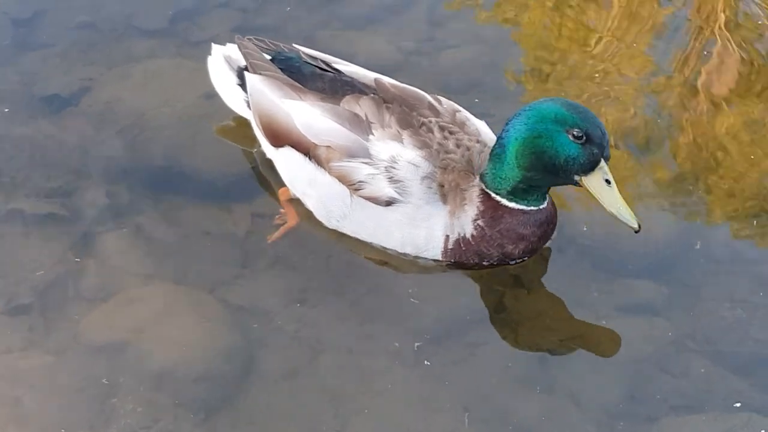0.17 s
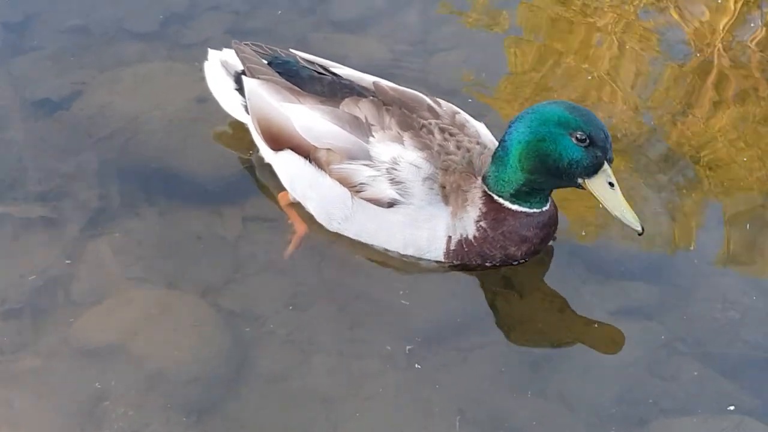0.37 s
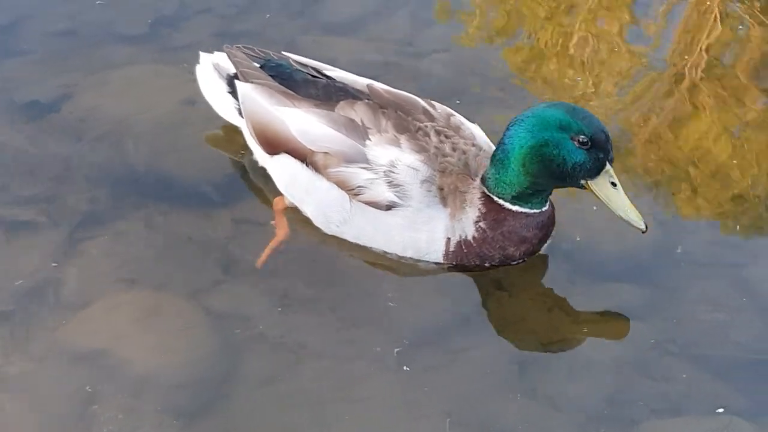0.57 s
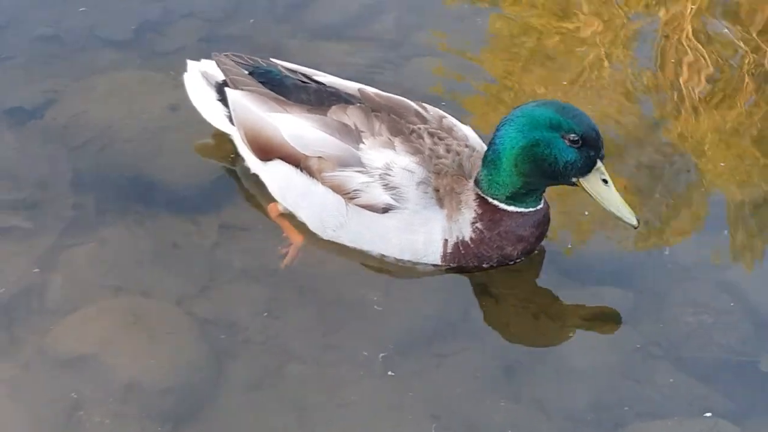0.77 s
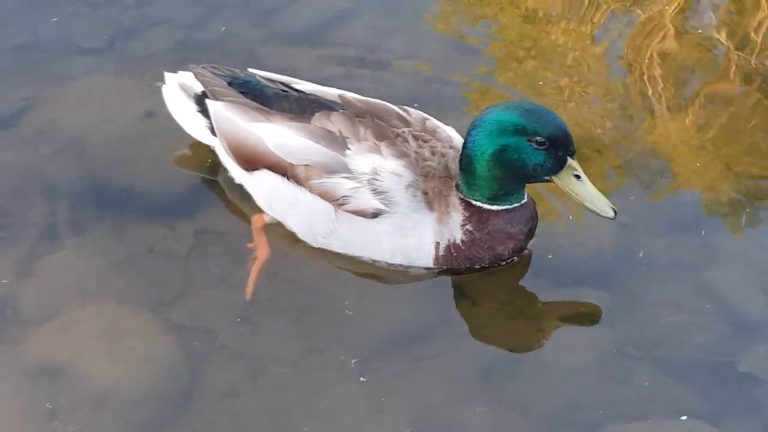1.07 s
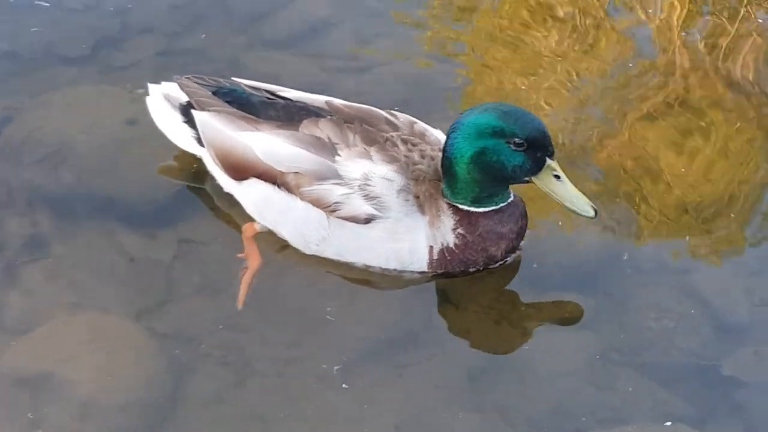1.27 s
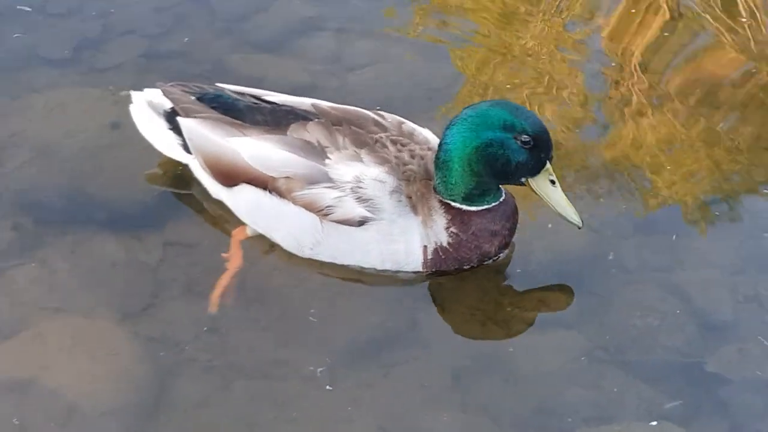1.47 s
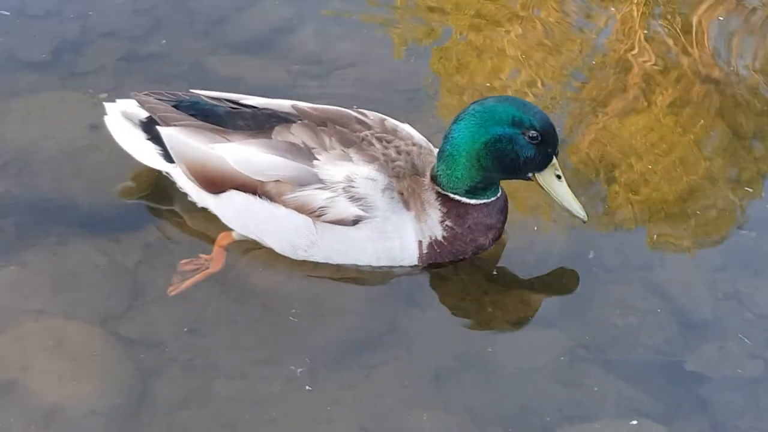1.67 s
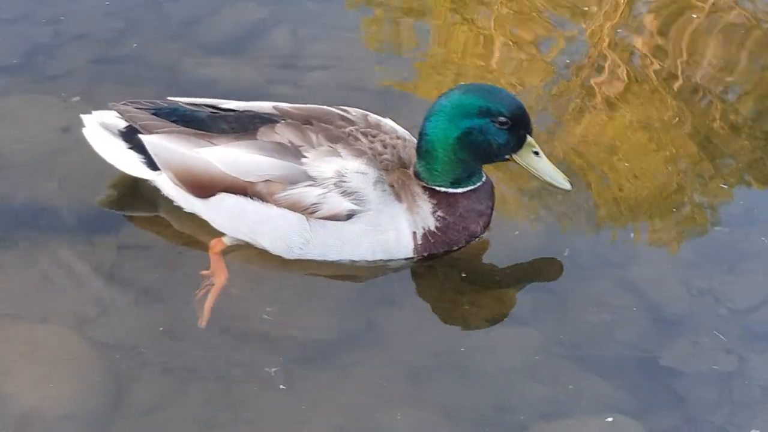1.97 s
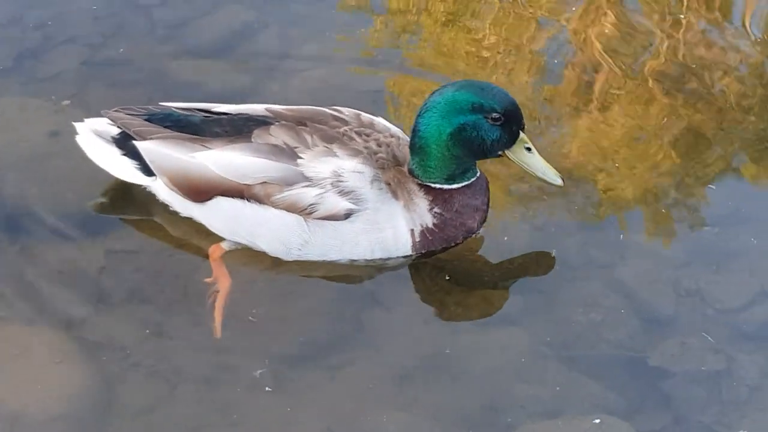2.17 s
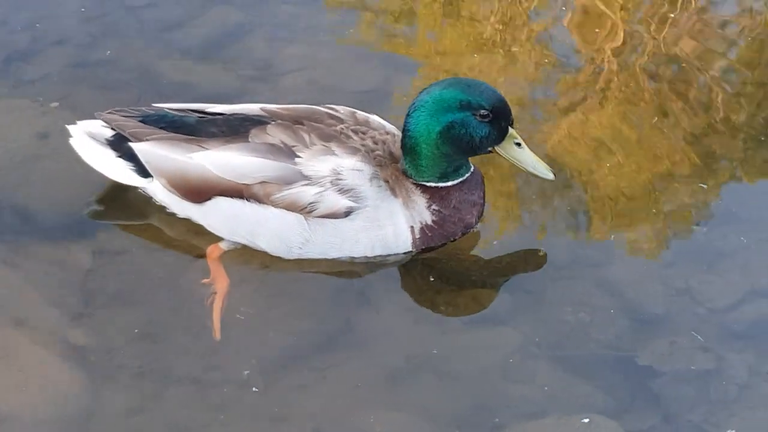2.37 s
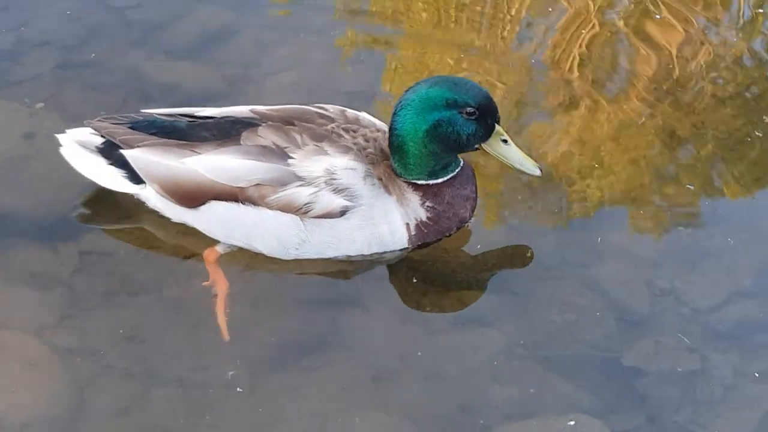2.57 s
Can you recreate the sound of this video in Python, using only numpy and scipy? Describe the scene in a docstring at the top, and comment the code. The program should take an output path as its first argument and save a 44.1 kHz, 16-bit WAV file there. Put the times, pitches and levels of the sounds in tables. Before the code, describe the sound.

Soft, raspy quacks come in quick little groups from a nearby duck on a pond. Under them is a quiet outdoor background, with light wind on the microphone, a faint rustle and a few low handling thumps, strongest midway.

```python
"""Pond. A mallard drake, close by on the right, gives soft raspy quacks, mostly in pairs.
Each is a short rattle of syrinx pulses ringing in throat and mouth, brighter with effort;
water and bank answer faintly. Handling bumps, scuffs and light wind rumble on the left
of the microphone; a soft rustle swells on the right, over quiet distant surroundings."""
import sys
import numpy as np
from scipy import signal
from scipy.fft import rfft, irfft
from scipy.io import wavfile
from scipy.ndimage import map_coordinates

SR = 44100
rng = np.random.default_rng(int(sys.argv[2]) if len(sys.argv) > 2 else 0)


def transcribe(u):
    """Save the signal u as a 16-bit wav file named by the first command-line argument.

    u: samples, shape (n,) or (channels, n), limited to [-1, 1]; the rate is SR.
    q: integer samples, one column per channel.
    """
    v = np.clip(np.atleast_2d(u).T, -1, 1)
    q = np.round(v * 32767).astype(np.int16)
    wavfile.write(sys.argv[1], SR, q)


N = 119952

# distant surroundings (frequency [Hz], level [dB])
POND_SPECTRUM = [(25, -16), (75, -0.5), (160, -2.5), (290, -8), (420, -20), (570, -21), (900, -30.5),
                 (1350, -29.5), (1650, -24), (2300, -31.5), (3200, -40.5), (5500, -39), (7600, -33),
                 (8600, -41.5), (15500, -40.5)]
# same (frequency [Hz], left-right correlation [-])
POND_CORRELATION = [(60, 1), (500, 0.86), (2000, 0.34), (8000, 0.34), (14000, 0.16)]
# wind (time [s], level [dB])
WIND_ENVELOPE = [(0, -48), (.3, -53.5), (.68, -51), (.8, -43), (1.05, -47.5), (1.2, -44), (1.48, -44.5),
                 (1.56, -48.5), (1.95, -47), (2.35, -48.5), (2.54, -43), (2.72, -39.5)]
# wind (frequency [Hz], level [dB])
WIND_SPECTRUM = [(20, -9.5), (45, 0), (90, 2), (140, -3), (220, -14.5), (400, -27), (700, -38), (1200, -43),
                 (4000, -117)]
# rustle (time [s], level [dB])
RUSTLE_ENVELOPE = [(0, -79), (.74, -71), (.8, -61.5), (.86, -55.5), (.96, -61), (1.01, -68), (1.08, -63.5),
                   (1.3, -62), (1.5, -59), (1.62, -58), (1.68, -65.5), (1.85, -70.5), (2.23, -71.5),
                   (2.3, -54.5), (2.39, -54), (2.52, -59.5), (2.72, -62)]
# rustle (frequency [Hz], level [dB])
RUSTLE_SPECTRUM = [(300, -23), (800, -14.5), (1300, -5), (1900, 0), (3000, -3), (5500, -3.5), (7400, 1),
                   (8500, -3.5), (10000, -5), (12500, -13.5), (15500, -32)]
# handling bumps (time [s], level [dB], settled pitch [Hz], decay [s])
BUMPS = [(.512, -35.5, 101, 0.013), (0.741, -34, 82, 0.018), (1.212, -29, 73.4, 0.007),
         (1.247, -18.5, 83.6, 0.005), (1.449, -26, 87, 0.0065), (1.468, -30.5, 61, 0.01),
         (1.493, -31, 92, 0.0065), (1.629, -23, 86, 0.0093), (1.713, -33.5, 72, 0.0079),
         (2.005, -28, 120, 0.0045), (2.018, -29.5, 64.6, 0.0075), (2.1251, -18, 89, 0.0066),
         (2.234, -34, 67, 0.0096), (2.367, -25.5, 91.4, 0.01), (2.464, -32, 49.7, 0.011),
         (2.511, -32.5, 113, 0.012), (2.616, -36, 130, 0.0069)]
# light scuffs on the housing (time [s], level [dB], decay [s])
SCUFFS = [(1.243, -45, 0.0051), (1.444, -64, 0.0083), (1.478, -57.5, 0.05), (2.123, -39.5, 0.0021),
          (2.37, -68, 0.0063), (2.513, -49.5, 0.016), (2.55, -55, 0.016), (2.617, -56, .01),
          (2.645, -53, .01)]
# scuffs (frequency [Hz], level [dB])
SCUFF_SPECTRUM = [(100, -38), (300, 3.5), (650, 1.5), (1100, -14.5), (2500, -29), (9000, -30)]
# puffs as the bill parts (time [s], level [dB], decay [s])
BILL_PUFFS = [(.2, -49, 0.028), (.737, -57, 0.074), (.905, -53.5, .015), (1.556, -54, 0.02),
              (1.71, -48.5, 0.022), (2.098, -49.5, 0.013), (2.648, -59.5, 0.047)]
# bill puffs (frequency [Hz], level [dB])
BILL_SPECTRUM = [(400, -1.5), (850, -3), (1080, 6), (1400, -1.5), (1750, 1.5), (2400, -12.5), (9000, -36),
                 (15000, -41)]
# quacks (start [s], length [s], level [dB], mean pulse rate [Hz], throat centre [Hz], glide [Hz],
#   mouth gain [dB], nasal centre [Hz], nasal gain [dB], rasp gain [dB], top centre [Hz], top gain [dB])
QUACKS = [(0.139, 0.058, -49.5, 105.5, 1550, -100, 8.5, 2630, -21, -1, 6300, -44),
          (0.223, 0.069, -34, 102.6, 1664, -17, 3, 3210, -20.5, -1.5, 6000, -39.5),
          (0.321, 0.045, -52, 104.4, 1580, -2, 6.5, 2250, -4, 3, 6300, -40),
          (0.395, 0.064, -41.5, 96, 1610, -150, 7, 2760, -27, 1.5, 6200, -38),
          (0.462, 0.063, -32.5, 101, 1692, 140, 4, 3200, -22.5, -0.5, 6300, -37),
          (0.767, 0.05, -35.5, 99.3, 1683, -110, -1, 2700, -27, -26, 6300, -38),
          (0.924, 0.068, -31, 102.1, 1675, 0, -0.5, 3050, -24, -1.5, 5950, -29.5),
          (0.9916, 0.081, -35.5, 94, 1660, -30, 4, 2610, -20, -0.5, 6600, -39),
          (1.1528, 0.069, -33, 96.6, 1637, 44, 2.5, 3080, -32, -5.5, 6330, -31),
          (1.259, 0.055, -38.5, 85.8, 1600, -160, 4.5, 2700, -20.5, -3, 6300, -39),
          (1.5738, 0.071, -32.5, 101.7, 1652, 47, -3, 2850, -24, 0, 6670, -31),
          (1.636, 0.055, -53, 99.2, 1420, -90, 7, 2980, -10, 13.5, 6500, -34),
          (1.732, .046, -35.5, 91.9, 1647, -50, -2, 2810, -29, -27, 6600, -40),
          (1.7795, 0.082, -34.5, 97.7, 1690, 88, 1.5, 2970, -26.5, -1, 6430, -29.5),
          (1.975, .083, -38, 88.7, 1634, -37, 4.5, 2760, -18.5, -8, 6420, -33.5),
          (2.1162, 0.07, -35, 101.7, 1715, 27, 3, 2880, -22, 4, 6600, -27),
          (2.235, 0.065, -40.5, 87.9, 1610, -110, 8, 2670, -24, 0.5, 6500, -32),
          (2.331, 0.069, -38.5, 86.1, 1722, 90, 4, 2780, -30, -1, 6300, -42),
          (2.668, 0.0493, -39, 90.7, 1650, -30, 4, 2720, -31, -5, 6540, -32)]
# mouth resonances (bill shut [Hz], bill open [Hz], width [Hz], gain [dB], effort share [-], swell [dB])
MOUTH_MODES = [(1076, 1200, 219, -18.5, 0.38, 7.5), (1802, 2038, 450, -12.5, 0.55, -1)]
# top resonances (frequency ratio [-], gain [dB])
TOP_MODES = [(.9, 0), (1, 1.5)]
# high rasp (frequency [Hz], level [dB])
RASP_SPECTRUM = [(900, -25), (2000, 6.5), (2400, 20.5), (2700, 13), (3000, 8), (3300, -4), (3520, 3),
                 (3920, 6), (4400, -4.5), (5000, -1.5), (5500, -12), (6600, -14), (7400, -3), (9000, -20),
                 (15000, -34)]

EDGE_DB, END_DB, CREST_FRACTION = -8.5, -11, .48  # effort arch
JITTER_S, SCATTER_DB, SLOWING = .0003, 2.25, 0.0808  # pulse train
RISE_S, PUFF_DECAY_S, LEAK_DB = 0.00068, 0.005, -12.5  # turbulence
THROAT_PUFF_DB, RASP_DB = -5.5, -17.5
HANDLING_PAN_DB = 12


def amp(db):
    """Decibels to gain."""
    return 10 ** (np.asarray(db) / 20)


def unit(x):
    """Scale to rms 1."""
    return x / np.sqrt(np.mean(x ** 2) + 1e-20)


def along(points, hz):
    """Interpolate (frequency [Hz], value) on a log axis."""
    knots_hz, values = np.transpose(points)
    return np.interp(np.log(hz + 1), np.log(knots_hz + 1), values)


def curve(rows):
    """Interpolate (time [s], value) per sample."""
    return np.interp(np.arange(N) / SR, *np.transpose(rows))


def wobble(rate_hz):
    """Smooth curve through random knots."""
    knots = rng.standard_normal(int(N * rate_hz / SR) + 4)
    return map_coordinates(knots, [np.arange(N) * rate_hz / SR])


def pan(db):
    """Channel gains for a left-minus-right level; louder side at 1."""
    return amp([[min(db, 0)], [min(-db, 0)]])


def add(track, start_s, sound):
    """Mix in at a time."""
    part = track[max(round(start_s * SR), 0):][:len(sound)]
    part += sound[:len(part)]


def colour(x, spectrum, size=4096):
    """Minimum-phase filter of unit energy."""
    cepstrum = irfft(np.log(amp(along(spectrum, np.fft.rfftfreq(size, 1 / SR)))))
    cepstrum[1:size // 2] *= 2
    cepstrum[size // 2 + 1:] = 0
    impulse = irfft(np.exp(rfft(cepstrum)))
    return signal.fftconvolve(x, impulse / np.linalg.norm(impulse))[:N]


def stereo_noise(spectrum, correlation):
    """Coloured, partly correlated noise, rms 1."""
    hz = np.fft.rfftfreq(N, 1 / SR)
    angle = np.arccos(np.clip(along(correlation, hz), -1, 1)) / 2
    bins = rfft(rng.standard_normal((2, N))) * amp(along(spectrum, hz))
    mid, side = irfft(bins * [np.cos(angle), np.sin(angle)], N)
    return unit(np.array([mid + side, mid - side]))


def bursts(rows, spectrum):
    """Decaying bursts of coloured noise."""
    track, t = np.zeros(N), np.arange(SR // 10) / SR
    for start_s, db, decay_s in rows:
        add(track, start_s, amp(db) * np.exp(-t / decay_s) * rng.standard_normal(len(t)))
    return colour(track, spectrum)


def resonate(x, hz, width_hz):
    """Three equal resonators in series, each width_hz wide; centre may move; rms 1."""
    carrier = np.exp(2j * np.pi * np.cumsum(hz * np.ones(len(x))) / SR)
    pole = np.exp(-np.pi * width_hz / SR)
    ring = signal.lfilter([1], np.poly([pole, pole, pole]), x / carrier)
    return unit((ring * carrier).real)


def pond(level_db=-53):
    """Steady wash of distant surroundings."""
    return amp(level_db) * stereo_noise(POND_SPECTRUM, POND_CORRELATION) * pan(db=-5.5)


def wind():
    """Light, lumpy rumble, mostly on the left microphone port."""
    level_db = curve(WIND_ENVELOPE) + 0.67 * wobble(rate_hz=8.2)
    return amp(level_db) * stereo_noise(WIND_SPECTRUM, correlation=[(100, 0.99)]) * pan(db=12)


def rustle():
    """Sliding hiss, like a sleeve near the right port."""
    hiss = stereo_noise(RUSTLE_SPECTRUM, correlation=[(3000, 0.89)])
    return amp(curve(RUSTLE_ENVELOPE)) * hiss * pan(db=-13.5)


def bumps(overshoot=1.85, sag_s=0.0024, rise_s=0.0019):
    """Soft knocks on the microphone housing: a cycle or two, sagging in pitch."""
    track, t = np.zeros(N), np.arange(SR // 8) / SR
    for start_s, db, hz, decay_s in BUMPS:
        cycles = hz * (t + overshoot * sag_s * (1 - np.exp(-t / sag_s)))
        envelope = (1 - np.exp(-(t / rise_s) ** 2)) * np.exp(-(t / (2 * decay_s)) ** 2)
        add(track, start_s, amp(db) * envelope * np.sin(2 * np.pi * cycles))
    return track * pan(HANDLING_PAN_DB)


def scuffs():
    """Light rubs on the housing."""
    return bursts(SCUFFS, SCUFF_SPECTRUM) * pan(HANDLING_PAN_DB)


def bank_echo(x, t60_s=.15, gain_db=-12):
    """Short diffuse reflection off water and bank."""
    t = np.arange(SR // 2) / SR
    tail = rng.standard_normal((2, len(t))) * amp(-60 * t / t60_s)
    echo = signal.fftconvolve(x[None], tail / np.linalg.norm(tail[0]), axes=1)[:, :N]
    return amp(gain_db) * echo * pan(db=-13)


def bill_puffs():
    """Faint air as the bill parts before some quacks."""
    return bursts(BILL_PUFFS, BILL_SPECTRUM)


def syrinx(length_s, rate_hz, release_s=0.006):
    """Source of one quack: slowing, uneven pulses, turbulence after each, an arch of effort."""
    t = np.arange(int((length_s + release_s) * SR)) / SR
    before_crest = np.maximum(1 - t / length_s / CREST_FRACTION, 0)
    after_crest = np.maximum((t / length_s - CREST_FRACTION) / (1 - CREST_FRACTION), 0)
    effort_db = EDGE_DB * before_crest ** 2 + END_DB * after_crest ** 2
    effort_db += np.interp(t, [length_s, t[-1]], [0, -18])  # release
    beats_s = np.arange(0, length_s, 1 / rate_hz)
    jitter, scatter = rng.standard_normal((16, 2))[:len(beats_s)].T
    beats_s = beats_s * (1 + SLOWING * (beats_s / length_s - 1)) + JITTER_S * jitter
    beat_samples = np.clip(beats_s * SR, 0, len(t) - 1).astype(int)
    pulses = np.bincount(beat_samples, amp(SCATTER_DB * scatter), len(t))
    puff_shape = np.exp(-t / PUFF_DECAY_S) * (1 - np.exp(-t / RISE_S))
    gate = signal.fftconvolve(pulses, puff_shape)[:len(t)]
    puffs = (unit(gate) + amp(LEAK_DB)) * rng.standard_normal(SR // 4)[:len(t)]
    return t, unit(pulses), unit(puffs), effort_db


def quacks(brightening=1.3):
    """Pulses ring the gliding throat and arching mouth; nasal ring, top ring and rasp grow with effort."""
    voice, rasp = np.zeros((2, N))
    for (start_s, length_s, db, rate_hz, throat_hz, glide_hz,
         mouth_db, nasal_hz, nasal_db, rasp_db, top_hz, top_db) in QUACKS:
        t, pulses, puffs, effort_db = syrinx(length_s, rate_hz)
        progress = np.minimum(t / length_s, 1)
        opening = np.sin(np.pi * progress)
        fade = np.minimum((t[-1] - t) / (t[-1] - length_s), 1)
        reedy = pulses + amp(THROAT_PUFF_DB) * puffs
        airy = pulses + puffs
        throat = resonate(reedy, throat_hz + glide_hz * (progress - .5), width_hz=323)
        add(voice, start_s, amp(db + effort_db) * throat)
        delayed_s = start_s + RISE_S
        for shut_hz, open_hz, width_hz, mode_db, share, swell_db in MOUTH_MODES:
            level_db = db + mouth_db + mode_db + share * effort_db + swell_db * (progress - .5)
            mouth = resonate(airy, shut_hz + (open_hz - shut_hz) * opening, width_hz)
            add(voice, delayed_s, amp(level_db) * fade * mouth)
        push = amp(db + brightening * effort_db)
        nasal = resonate(airy, nasal_hz, width_hz=330)
        add(voice, delayed_s, amp(nasal_db) * push * opening * nasal)
        for ratio, mode_db in TOP_MODES:
            top = resonate(puffs, ratio * top_hz, width_hz=650)
            add(voice, delayed_s, amp(top_db + mode_db) * push * top)
        add(rasp, delayed_s, amp(rasp_db + RASP_DB) * push * puffs)
    return voice + colour(rasp, RASP_SPECTRUM)


def scene():
    """Drake on the right, over the pond and the noises at the microphone."""
    drake = quacks() + bill_puffs()
    return pond() + bumps() + scuffs() + bank_echo(drake) + wind() + rustle() + drake * pan(db=-15)


def record(dry, cutoff_hz=15700):
    """Brick-wall low-pass."""
    padded = np.pad(dry, ((0, 0), (SR, SR)), "reflect")
    size = padded.shape[1]
    passband = np.fft.rfftfreq(size, 1 / SR) < cutoff_hz
    return irfft(rfft(padded) * passband, size)[:, SR:SR + N]


dry = scene()
out = record(dry)
transcribe(out)
```